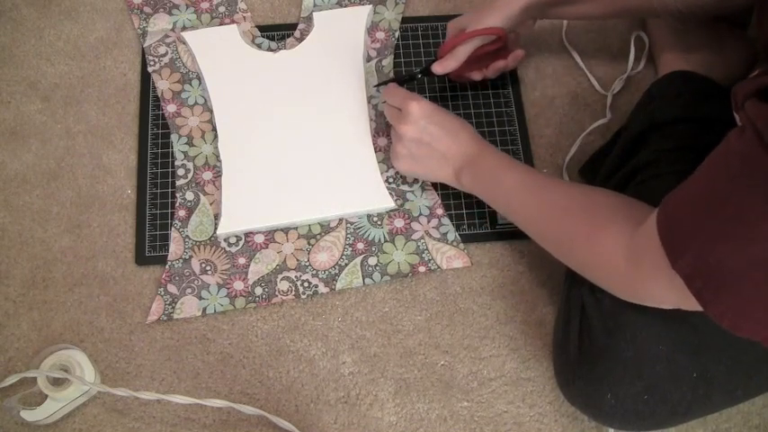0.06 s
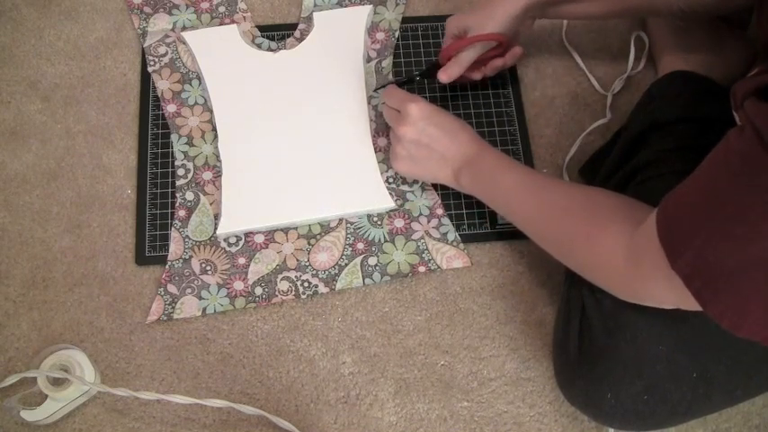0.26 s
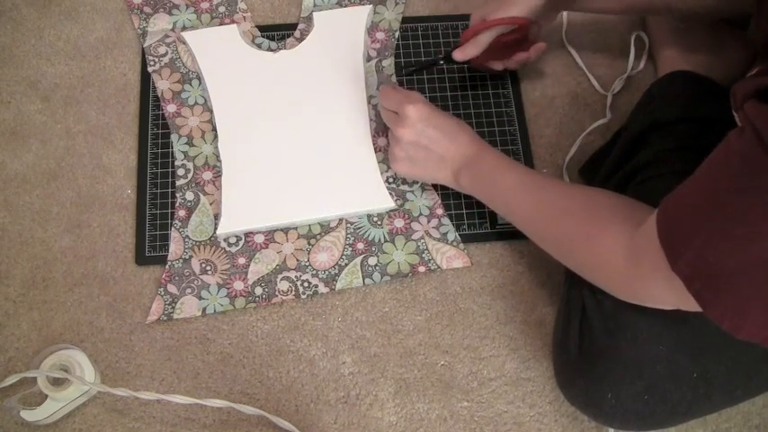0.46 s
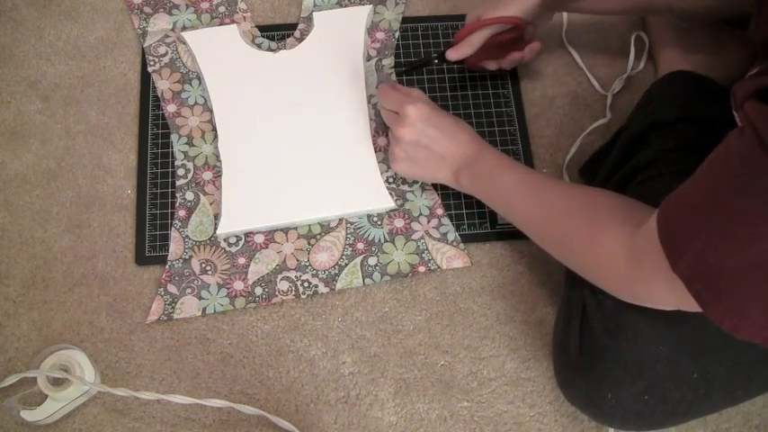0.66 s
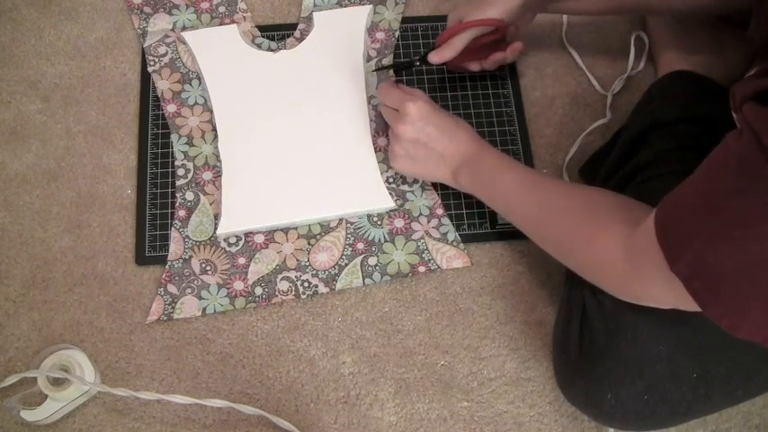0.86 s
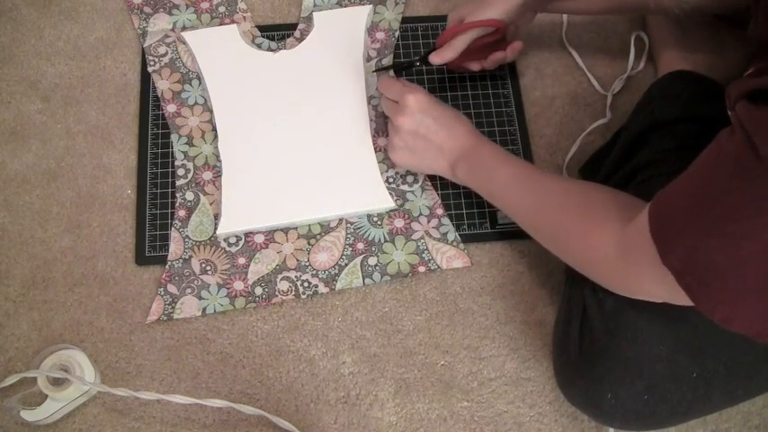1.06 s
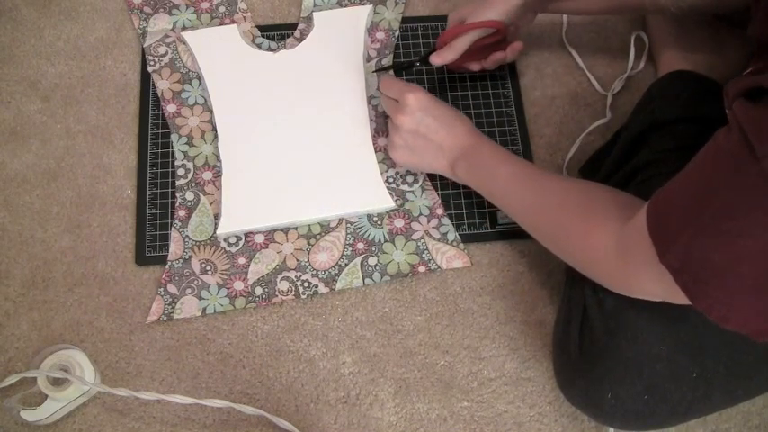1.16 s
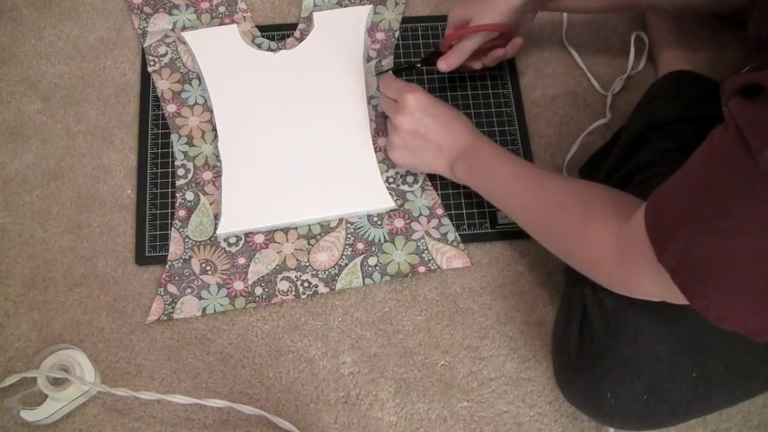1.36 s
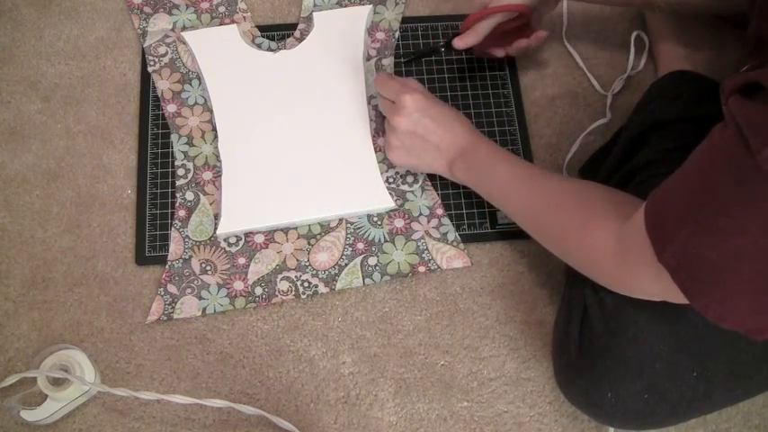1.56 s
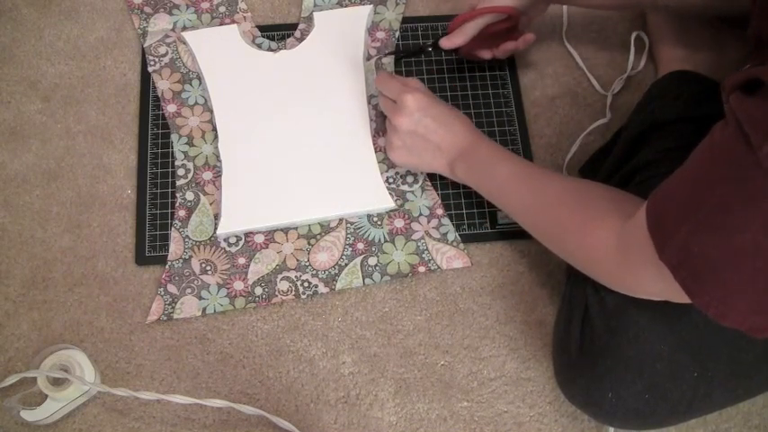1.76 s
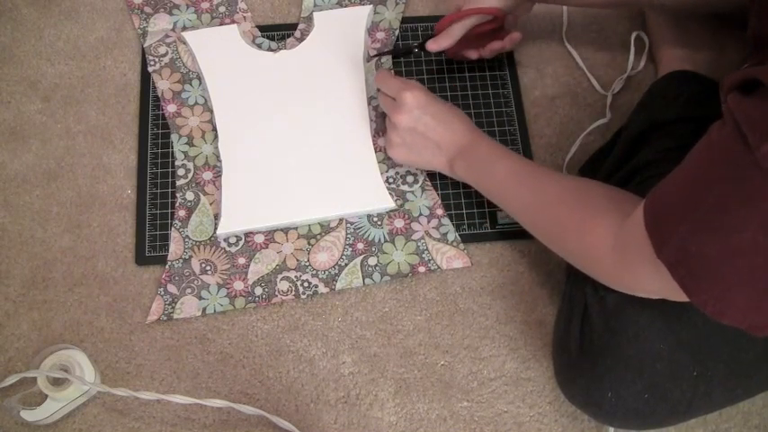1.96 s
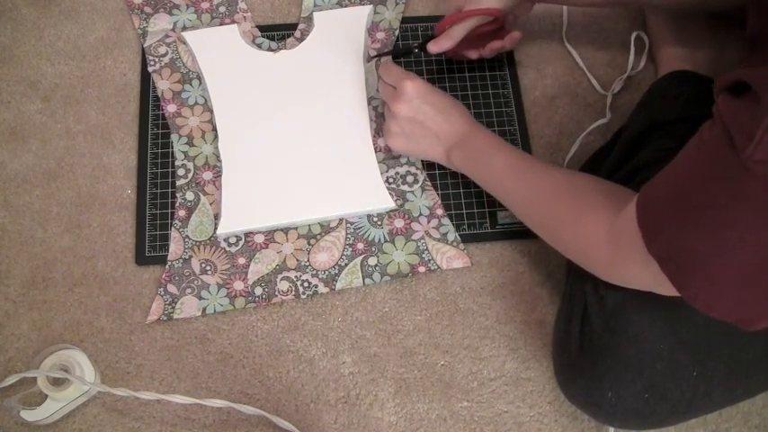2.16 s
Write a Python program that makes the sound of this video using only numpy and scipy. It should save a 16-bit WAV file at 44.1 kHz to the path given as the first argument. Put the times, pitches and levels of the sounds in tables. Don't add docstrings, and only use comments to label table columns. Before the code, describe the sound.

Scissors cut cloth twice on a mat, crisp rasping snips ending in snaps and dull knocks

```python
import sys
import numpy as np
from scipy import signal
from scipy.fft import rfft, irfft, next_fast_len
from scipy.io import wavfile

SR = 44100
rng = np.random.default_rng(int(sys.argv[2]) if len(sys.argv) > 2 else 0)


def magnitude_from_level(level_db):
    exponent = np.asarray(level_db, float) / 20
    return 10 ** exponent


def inscribe(sig):
    pcm = np.round(np.clip(np.atleast_2d(sig).T, -1, 1) * 32767)
    wavfile.write(sys.argv[1], SR, pcm.astype(np.int16))


N = 97020
T = np.arange(N) / SR


def rms_one(x):
    return x / np.sqrt(np.mean(x ** 2) + 1e-20)


def at_hz(points, hz):
    table_hz, value = np.transpose(points)
    return np.interp(np.log(hz), np.log(table_hz), value)


def lowpass(x, hz):
    return signal.sosfilt(signal.butter(2, hz, fs=SR, output="sos"), x)


def band(x, low_hz, high_hz, order=2):
    edges_hz = [low_hz, min(high_hz, 0.45 * SR)]
    return signal.sosfilt(signal.butter(order, edges_hz, "band", fs=SR, output="sos"), x)


def resonate(x, hz, width_hz):
    r = np.exp(-np.pi * width_hz / SR)
    poles = [1, -2 * r * np.cos(2 * np.pi * hz / SR), r * r]
    return signal.lfilter([(1 - r * r) / 2, 0, (r * r - 1) / 2], poles, x + 1e-18)


def colour(x, spectrum):
    hz = np.maximum(np.fft.rfftfreq(N, 1 / SR), 1)
    edge = magnitude_from_level(-30 * np.maximum(np.log2(spectrum[0][0] / hz), 0))
    return rms_one(irfft(rfft(x) * magnitude_from_level(at_hz(spectrum, hz)) * edge, N))


def drift(rate_hz):
    r = np.exp(-40 * np.pi * rate_hz / SR)
    noise = rng.standard_normal(size=N // 20 + 2002)
    slow = signal.lfilter([1], [1, -2 * r, r * r], noise)[2000:]
    return np.interp(np.arange(N) / 20, np.arange(len(slow)), rms_one(slow))


def grains(rate_per_s, spread_db):
    size = magnitude_from_level(spread_db * np.minimum(rng.exponential(1, N), 5)) * rng.choice([-1, 1], N)
    return rms_one(size * (rng.random(N) < rate_per_s / SR))


def swell(rows):
    power = np.zeros(N)
    for start_s, rise_s, hold_s, fall_s, level_db in rows:
        rise_s = max(rise_s, 0.0005)
        fall_s = max(fall_s, 0.8 * hold_s, 0.001)
        end_s = start_s + rise_s + hold_s + 5 * fall_s
        part = slice(max(int(start_s * SR), 0), int(end_s * SR))
        u = T[part] - start_s
        fall_db = 20 * np.maximum(u - rise_s - hold_s, 0) / fall_s
        power[part] += (magnitude_from_level(level_db - fall_db) * np.clip(u / rise_s, 0, 1) ** 2) ** 2
    return np.sqrt(power)


def burst(start_s, length_s):
    return swell([(start_s, 0.001, length_s / 2, length_s, 0)])


# freq_hz, level_db_per_hz
AIR_SPECTRUM = [(30, -16.5), (130, -3.5), (330, 0.5), (900, -5.5), (1800, -11), (4000, -19.5), (12500, -32),
                (15500, -32.5)]
# freq_hz, likeness_0_to_1
AIR_LIKENESS = [(60, 0.55), (500, 0.044), (3000, 0.055), (15000, 0.125)]


def air():
    hz = np.maximum(np.fft.rfftfreq(N, 1 / SR), 1)
    alike = np.clip(at_hz(AIR_LIKENESS, hz), 0, 1)
    mid, side = (rfft(colour(rng.standard_normal(N), AIR_SPECTRUM)) for _ in range(2))
    both = np.sqrt(1 + alike) * mid + np.sqrt(1 - alike) * side * [[1], [-1]]
    return magnitude_from_level(-55 + 1.06 * drift(7.9)) * rms_one(irfft(both, N))


def room(x):
    t60_s, wall_cut_hz = 0.2, 3200
    size = next_fast_len(N + SR // 2)
    w = 2 * np.pi * np.fft.rfftfreq(size)
    dull = 1 / (1 + 1j * w * SR / (2 * np.pi * wall_cut_hz))
    paths = np.zeros((2, len(w)), complex)
    for k, lag in enumerate(rng.uniform(0.0086, 0.03, 12) * SR):
        loop = magnitude_from_level(-60 * lag / SR / t60_s) * dull * np.exp(-1j * w * lag)
        paths[k % 2] += (-1) ** (k // 2) * loop / (1 - loop)
    return irfft(rfft(x, size) * paths, size)[:, :N]


# start_s, rise_s, hold_s, fall_s_per_20db, level_db
BRUSH_SWELLS = [(.72, 0.0325, 0.013, 1, -76), (.92, 0.078, 0.14, .3, -69.5),
                (1.555, 0.012, 0.035, .09, -69), (2.04, 0.079, 0.064, 2.0, -66.5)]


def brushing():
    return swell(BRUSH_SWELLS) * rms_one(band(grains(8000, 1.1), 4070, 11800))


# freq_hz, level_db_per_hz
MAT_SPECTRUM = [(71, -31), (120, -22), (300, 2), (541, -5), (1230, -11.5), (2280, -41), (6000, -40),
                (7800, -83), (13200, -120)]
# freq_hz, width_hz, level_db
MAT_RINGS = [(238, 39, 1.5), (353, 23, -2), (444, 23, 0.5), (535, 17, 10), (735, 13.3, -6), (768, 6.8, 11),
             (1008, 180, -3), (1380, 43, -19)]


def rubbing():
    rub = colour(grains(8000, 1.2), MAT_SPECTRUM)
    rings = sum(magnitude_from_level(level_db) * resonate(rub, hz, width_hz) for hz, width_hz, level_db in MAT_RINGS)
    return rms_one(rub + magnitude_from_level(-1.5) * rms_one(rings)) * magnitude_from_level(1.0 * drift(52.0))


# start_s, rise_s, hold_s, fall_s_per_20db, level_db
SLIDE_SWELLS = [(0.47, 0.0031, 0.032, 0.02, -48), (0.57, 0.0024, 0.027, 0.21, -44),
                (.67, 0.078, 0.085, 0.15, -43.5), (0.76, 0.055, 0.029, 0.12, -44),
                (1.42, 0.008, 0.025, -0.03, -44), (0.837, 0.026, 0.046, .06, -49.5),
                (1.489, 0.025, 0.02, -0.53, -46), (1.545, 0.037, 0.013, 0.42, -46),
                (1.589, 0.013, 0.039, -0.05, -41), (1.722, 0.085, 0.11, 0.07, -45),
                (0.28, 0.011, 0.024, 0.36, -54), (0.042, 0.046, 0.047, 1.5, -63)]


def slides():
    split_hz, quickness, bright_db = 375, 0.36, -0.5
    rub = rubbing()
    brisk = []
    for start_s, rise_s, hold_s, fall_s, level_db in SLIDE_SWELLS:
        longer_hold_s = hold_s + rise_s * (1 - quickness)
        brisk.append((start_s, rise_s * quickness, longer_hold_s, fall_s * quickness, level_db + bright_db))
    rumble = swell(SLIDE_SWELLS) * band(rub, 66, split_hz)
    return rumble - swell(brisk) * band(rub, split_hz, 6400)


# start_s, peak_db, contact_ms, sign
MAT_KNOCKS = [(.289, -22.5, 0.43, -1), (0.2938, -18, 0.75, 1), (0.478, -30.5, 0.82, 1),
              (.575, -18.5, 0.52, 1), (1.4117, -23, 0.41, 1), (1.414, -17, 0.64, 1),
              (1.5117, -37, 0.45, -1), (1.517, -39, 0.75, -1), (1.6005, -26, 0.46, 1),
              (1.6076, -29, 0.5, 1), (1.623, -34.5, 0.61, -1)]
# freq_hz, decay_s_per_30db, level_db
THUD_MODES = [(294, 0.11, -4), (648, 0.16, -9), (1333, 0.036, -5)]


def knocks():
    cut_hz, edge_db, rebound_db, rebound_stretch = 2580, -32, -10.5, 3.28
    push = 1e-9 * rng.standard_normal(N)
    for start_s, peak_db, contact_ms, sign in MAT_KNOCKS:
        part = slice(int(start_s * SR), int(start_s * SR) + 600)
        u = (T[part] - start_s) / (contact_ms / 1000)
        swing = np.sin(np.pi * np.clip(u, 0, 2)) * np.clip(u / 1.01, 0.6, 1)
        rebound = magnitude_from_level(rebound_db) * np.sin(np.pi * np.clip((u - 2) / rebound_stretch, 0, 1))
        push[part] += np.sign(sign) * magnitude_from_level(peak_db) * (swing + rebound)
    jolt = np.abs(np.diff(push, prepend=0)) * rng.standard_normal(N) * 10
    edge = magnitude_from_level(edge_db) * band(jolt, 2500, 10000)
    knock = band(band(push, 115, cut_hz), 84, 9900)
    knock = lowpass(knock, cut_hz * 1.65)
    thud = sum(magnitude_from_level(level_db) * resonate(knock, hz, 1.1 / t60_s) for hz, t60_s, level_db in THUD_MODES)
    return edge + knock + thud


# start_s, rise_s, hold_s, fall_s_per_20db, level_db
PINCH_SWELLS = [(.29, 0.0023, 0.0057, 0.2, -53), (.58, 0.002, 0.021, -0.14, -51.5),
                (1.505, 0.008, 0.0053, 0.33, -57.5), (1.565, 0.0045, 0.014, -0.37, -53.5),
                (1.596, 0.0036, 0.03, 0.01, -45), (1.65, .005, .012, -0.2, -57),
                (.705, 0.0056, 0.14, -0.05, -58.5), (1.745, 0.02, 0.093, 0.3, -56.5)]


def pinch():
    drag = band(grains(8000, 0.94), 644, 1830, order=3)
    line = rms_one(resonate(drag, 1402, 35))
    return swell(PINCH_SWELLS) * (rms_one(drag) + magnitude_from_level(-8.5) * line)


# start_s, rise_s, hold_s, fall_s_per_20db, level_db
CHATTER_SWELLS = [
    (1.408, 0.0012, 0.0038, 0.0113, -30),
    (1.423, 0.0037, 0.014, 0.04, -40),
]
# freq_hz, width_hz, level_db
TIP_MODES = [(980, 250, -4.5), (1441, 61, -0.5), (1930, 100, -10), (2310, 220, -13), (3240, 300, -15.5)]


def chatter():
    force = swell(CHATTER_SWELLS) * grains(9000, 1.5) + 1e-9
    out = np.zeros(N)
    for k, (hz, width_hz, level_db) in enumerate(TIP_MODES):
        ring = resonate(force, hz, width_hz) * np.sqrt(14000 / width_hz)
        out += (-1) ** k * magnitude_from_level(level_db) * ring
    return out


# start_s, level_db, length_s, pitch_hz
METAL_TICKS = [(.112, -63, .015, 4600), (.150, -59, 0.02, 4560), (0.185, -52.5, 0.018, 4770),
               (0.201, -52, 0.013, 4060), (0.461, -62, 0.0069, 4000), (0.4726, -53, 0.003, 6900),
               (0.474, -54, 0.0027, 2250), (0.287, -48, .01, 10000), (1.378, -55, .015, 10100),
               (0.479, -64, 0.01, 7250), (0.490, -68, 0.0044, 5000), (0.495, -66, 0.005, 4830),
               (1.2662, -49.5, 0.0048, 4700), (1.264, -59, .005, 3700), (1.272, -60, 0.0062, 8900),
               (1.291, -60, .012, 4950), (1.296, -62, 0.012, 8450), (1.375, -45, .01, 7040),
               (1.558, -60.5, 0.0047, 7100), (1.563, -49, 0.0058, 2180), (1.57, -68, 0.02, 7150),
               (1.681, -66, 0.01, 4050)]
# start_s, rise_s, hold_s, fall_s_per_20db, level_db
WIPE_SWELLS = [(.4732, .001, .003, 0.02, -53.5), (.478, 0.0018, 0.0098, 0.12, -61),
               (1.5625, 0.0011, .003, 0.02, -61), (1.567, .01, 0.03, 0.1, -64),
               (1.408, 0.0017, 0.0057, 0.0277, -48)]


def ticks():
    sharpness = 7.4
    scrape = grains(14000, 1.7)
    forces, rings = np.zeros((2, N))
    for start_s, level_db, length_s, hz in METAL_TICKS:
        force = (magnitude_from_level(level_db) * burst(start_s, length_s) + 1e-9) * scrape
        ring = resonate(resonate(force, hz, hz / sharpness), hz, hz / sharpness)
        rings += ring * np.sqrt(163000.0 / hz)
        forces += force
    hiss = magnitude_from_level(-8) * band(forces, 2000, 5500)
    return rings + hiss + swell(WIPE_SWELLS) * rms_one(band(scrape, 1600, 8900))


# time_s, shear_db, push_db
CUT_STROKES = [
    [(0.095, -102.5, -78), (0.121, -59, -60), (0.139, -72, -94), (0.151, -66.5, -60.5),
     (0.212, -52.5, -46.5), (0.24, -47.5, -37), (0.293, -40.5, -27), (0.301, -47, -30.5),
     (0.37, -68.5, -70)],
    [(1.255, -63, -87.5), (1.271, -58, -51), (1.336, -50, -52), (1.347, -47.5, -39), (1.391, -41, -34.5),
     (1.401, -48.5, -40), (1.413, -38.5, -35), (1.423, -53, -41), (1.47, -67.5, -59)],
]
# start_s, level_db, length_s
TIP_SNAPS = [
    (0.286, -49.5, 0.0062),
    (1.407, -54, 0.0079),
]


def stroke():
    push_most_db = -34
    shear, push, travel = np.zeros((3, N))
    for rows, (shut_s, _, _) in zip(CUT_STROKES, TIP_SNAPS):
        time_s, shear_db, push_db = np.transpose(rows)
        inside = (T > time_s[0]) & (T < time_s[-1])
        shear += inside * magnitude_from_level(np.interp(T, time_s, shear_db))
        push += inside * magnitude_from_level(np.minimum(np.interp(T, time_s, push_db), push_most_db))
        travel += inside * np.clip((T - time_s[0]) / (shut_s - time_s[0]), 0, 1) ** 2
    return shear, push, travel


def crunch(push, travel):
    note_hz = 329 + 501.6 * travel + 24.77 * drift(15.32)
    phase = 2 * np.pi * np.cumsum(note_hz) / SR
    a, b = lowpass(rng.standard_normal((2, N)), 133)
    note = rms_one(a * np.cos(phase) + b * np.sin(phase))
    return push * rms_one(band(rubbing(), 383, 11000) + magnitude_from_level(0.5) * note)


# start_s, boost_db, length_s
THREAD_BITES = [(0.11, 1, 0.012), (0.153, 6.5, 0.0133), (0.189, 4, 0.025), (.226, 2, 0.029),
                (0.272, 2.5, 0.012), (1.271, 5, 0.0129), (1.291, 3.5, 0.018), (1.319, 2.5, 0.02),
                (1.342, 1, .02), (1.378, 1.5, 0.015)]
# freq_hz, width_hz, pivot_db, tip_gain_db
BLADE_MODES = [(2350, 510, -8.5, 4.5), (3660, 630, -9, 1), (4780, 310, -0.5, -7.5), (5730, 930, -20, 1),
               (6500, 740, -15.5, 7.5), (7130, 680, -18.5, 13.5), (8170, 310, -8, -0.5),
               (9030, 520, -12.5, 7), (9760, 1000, -20.5, 15.5), (12470, 1100, -24, 15),
               (13900, 770, -30.5, 0)]


def blades(shear, travel):
    hiss_low_hz, hiss_high_hz, bite_ring, flicker_db = 1115, 8360, 0.36, 3
    bite = magnitude_from_level(-3 + sum(boost_db * burst(start_s, length_s) for start_s, boost_db, length_s in THREAD_BITES))
    snap = sum(magnitude_from_level(level_db) * burst(start_s, length_s) for start_s, level_db, length_s in TIP_SNAPS)
    judder = magnitude_from_level(1.5 * drift(70.0))
    force = grains(12000, 2) * (shear * bite * judder + snap + 1e-9)
    out = magnitude_from_level(-0.5) * band(force, hiss_low_hz, hiss_high_hz, order=3)
    out += band(force * magnitude_from_level(-25.5 + 19.5 * travel), hiss_high_hz, 14000)
    flicker = drift(34.0)
    for hz, width_hz, pivot_db, tip_gain_db in BLADE_MODES:
        mode_db = pivot_db + tip_gain_db * travel + flicker_db * np.roll(flicker, int(hz))
        ring = resonate(force * bite ** bite_ring * magnitude_from_level(mode_db), hz, width_hz)
        out += ring * np.sqrt(6000 / width_hz)
    return out


def scene():
    pan_db, shadow_hz, shadow_s, shadow_db = -0.42, 7340, 0.022, -9
    shear, push, travel = stroke()
    near = blades(shear, travel) + ticks() + crunch(push, travel) + knocks()
    near += pinch() + chatter() + slides() + brushing()
    treble = signal.sosfilt(signal.butter(4, shadow_hz, "high", fs=SR, output="sos"), near)
    treble += magnitude_from_level(5.5) * band(near, 11000, 14000, order=3)
    scatter = rng.standard_normal(size=2000) * np.exp(-T[:2000] / shadow_s)
    scattered = signal.fftconvolve(treble, scatter / np.linalg.norm(scatter))[:N]
    side = magnitude_from_level(shadow_db) * scattered * [[1], [-1]]
    direct = near * magnitude_from_level(np.array([[pan_db], [-pan_db]]))
    return direct + side + magnitude_from_level(-16) * room(near) + air()


def band_limit(x):
    return signal.sosfilt(signal.butter(12, 15730, fs=SR, output="sos"), x)


def record(dry):
    low_cut = signal.butter(2, 56, "high", fs=SR, output="sos")
    top_cut = signal.cheby2(12, 50, 15950, fs=SR, output="sos")
    mix = signal.sosfilt(np.vstack([low_cut, top_cut]), dry)
    return band_limit(mix)


dry = scene()
out = record(dry)
inscribe(out)
```